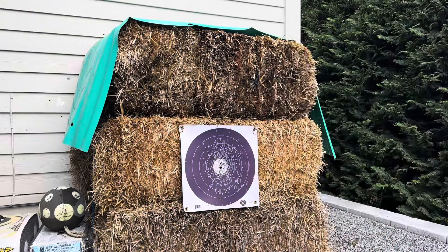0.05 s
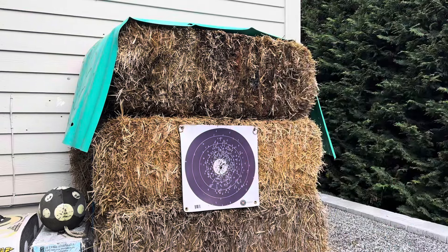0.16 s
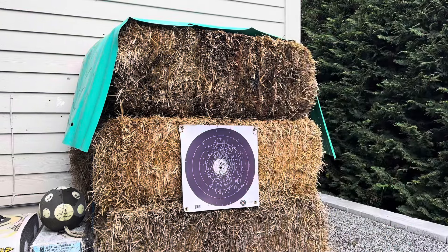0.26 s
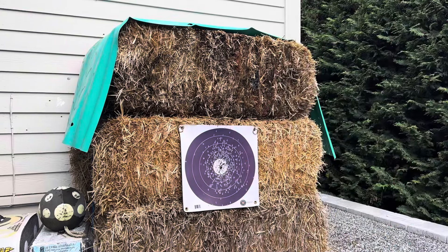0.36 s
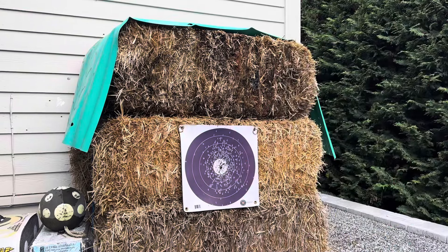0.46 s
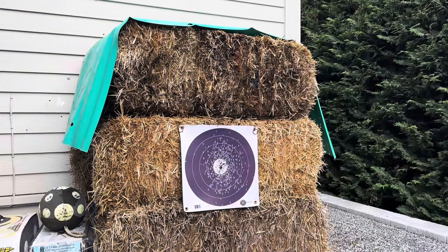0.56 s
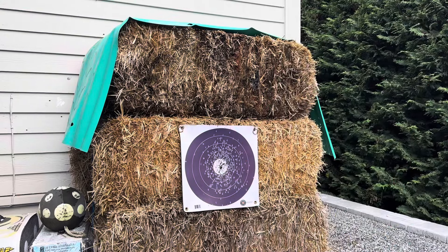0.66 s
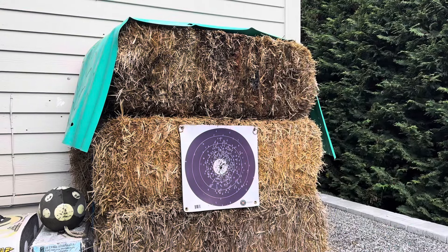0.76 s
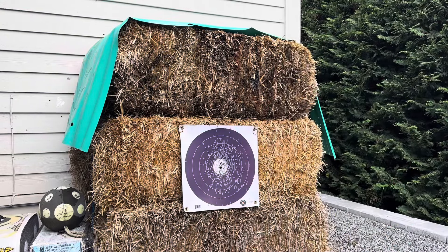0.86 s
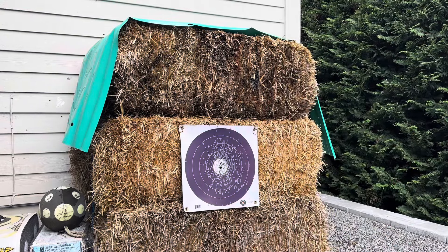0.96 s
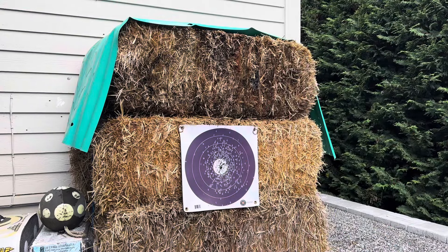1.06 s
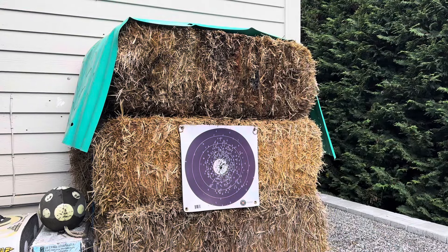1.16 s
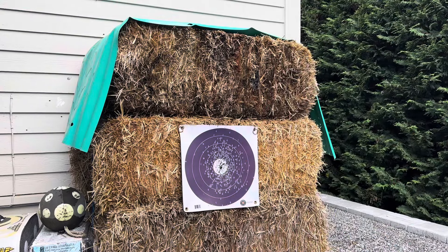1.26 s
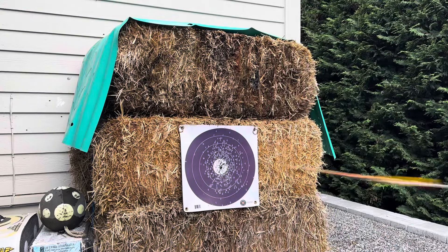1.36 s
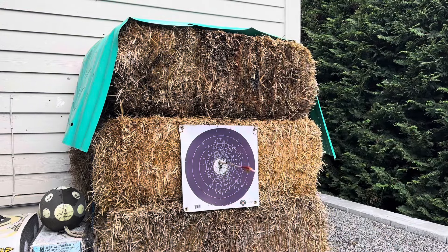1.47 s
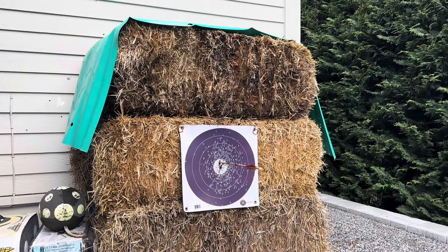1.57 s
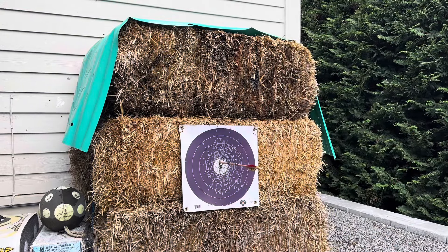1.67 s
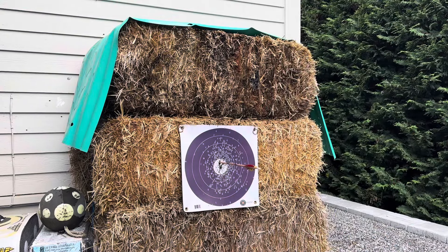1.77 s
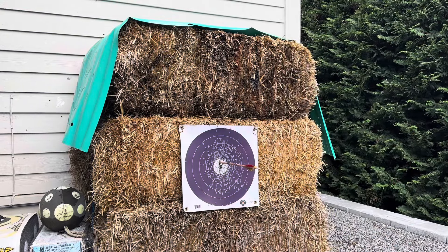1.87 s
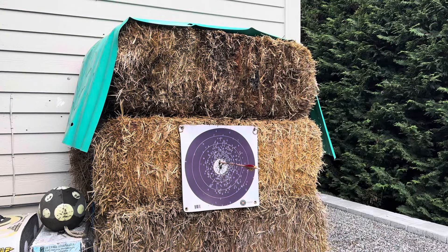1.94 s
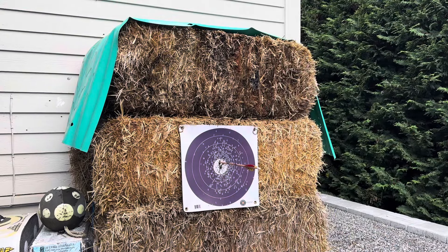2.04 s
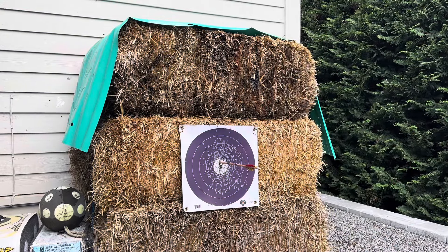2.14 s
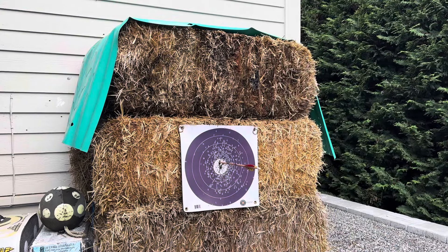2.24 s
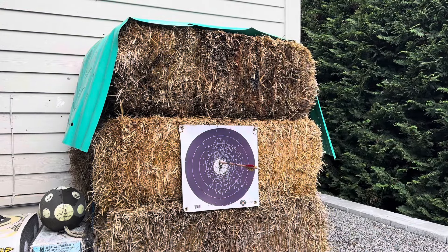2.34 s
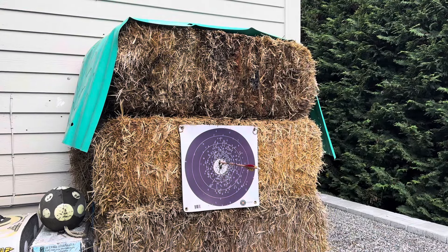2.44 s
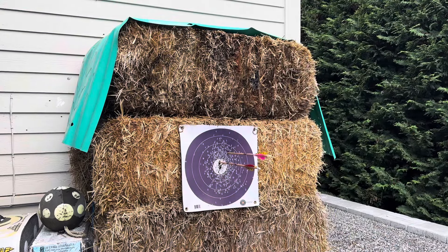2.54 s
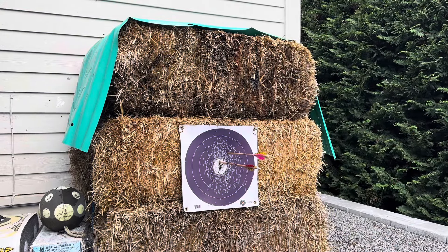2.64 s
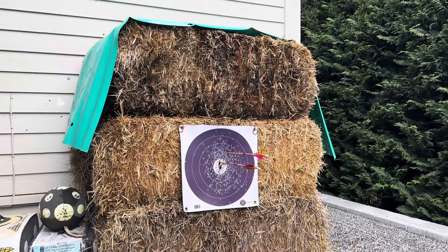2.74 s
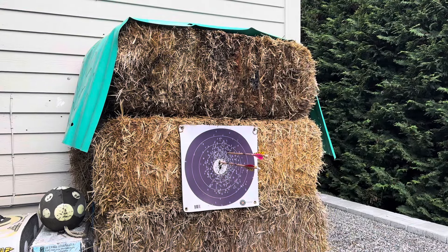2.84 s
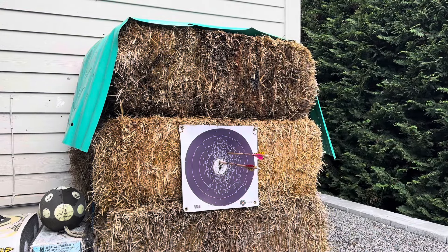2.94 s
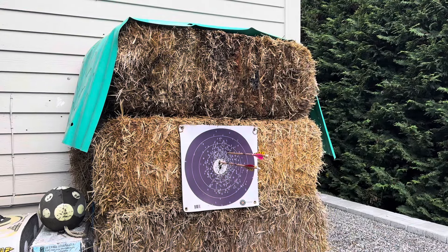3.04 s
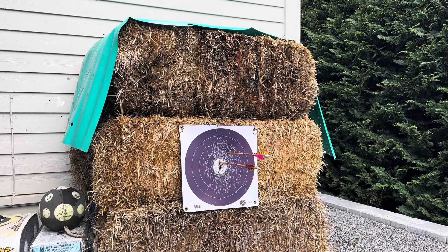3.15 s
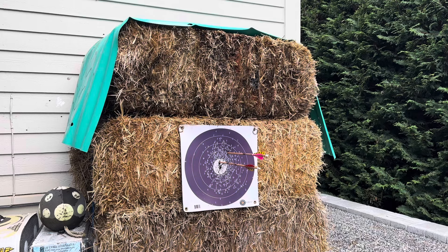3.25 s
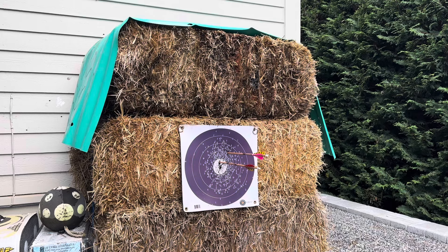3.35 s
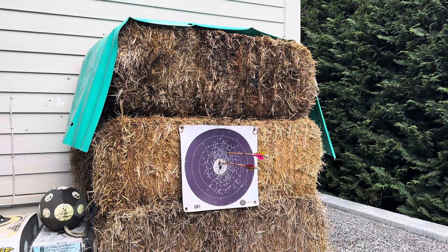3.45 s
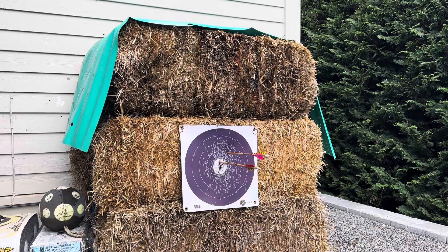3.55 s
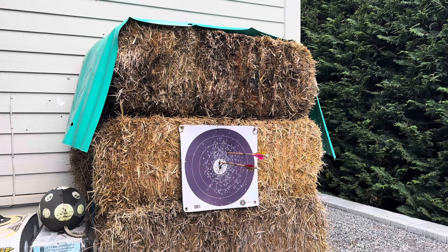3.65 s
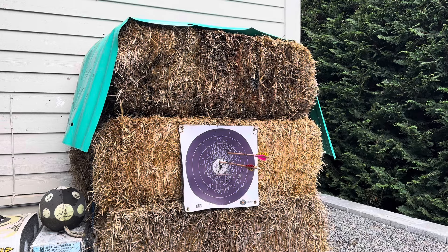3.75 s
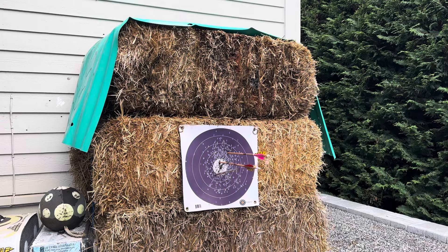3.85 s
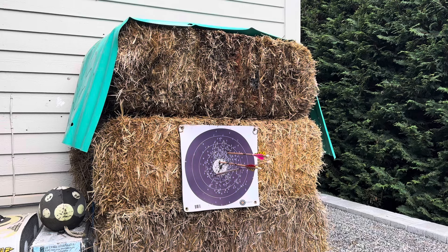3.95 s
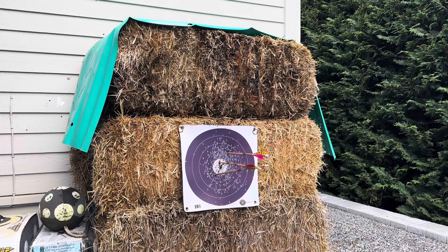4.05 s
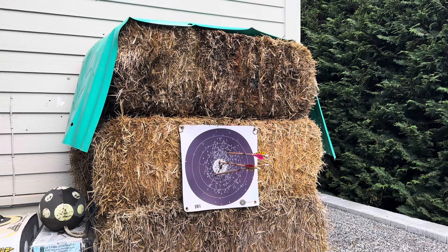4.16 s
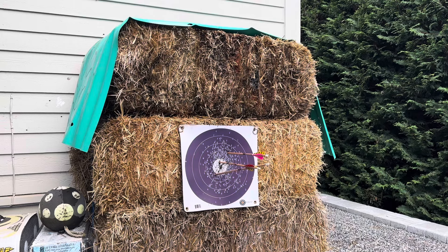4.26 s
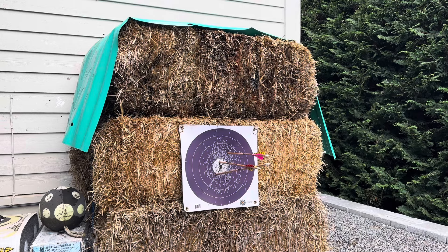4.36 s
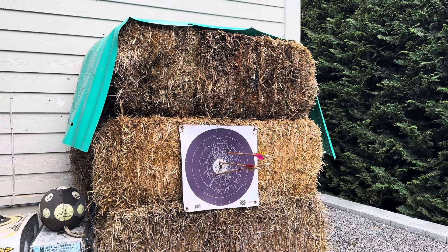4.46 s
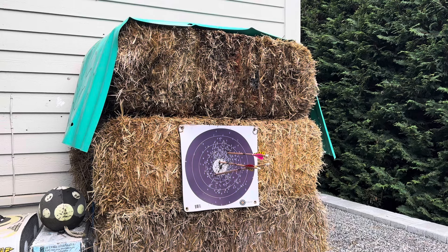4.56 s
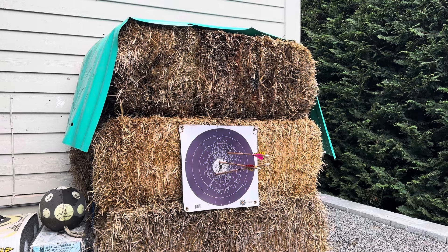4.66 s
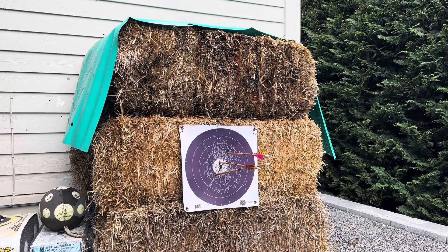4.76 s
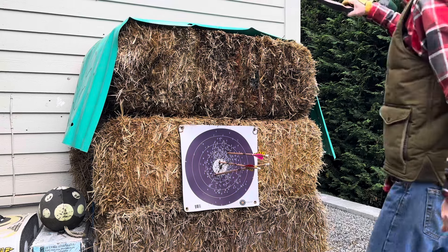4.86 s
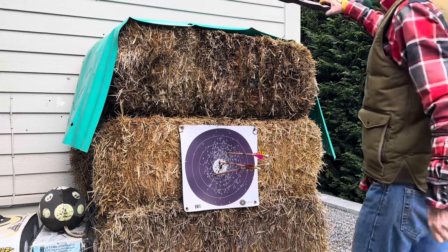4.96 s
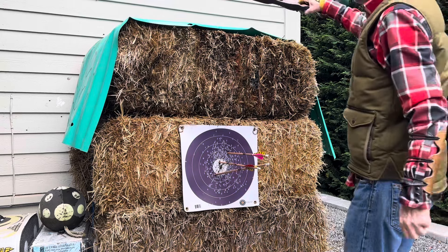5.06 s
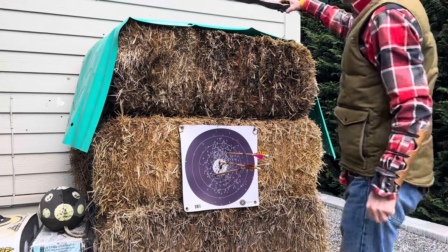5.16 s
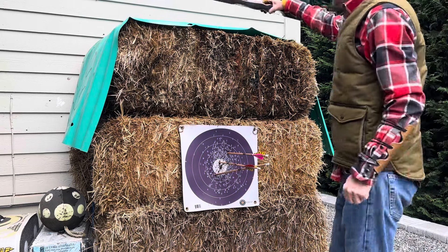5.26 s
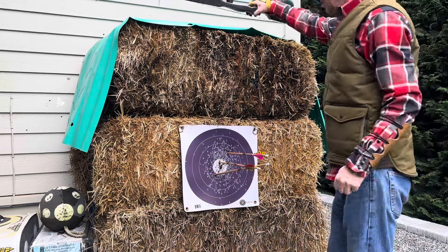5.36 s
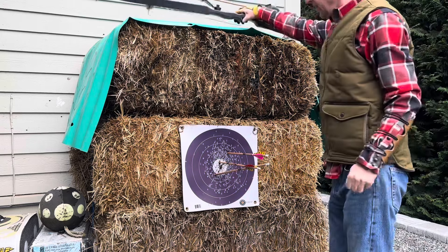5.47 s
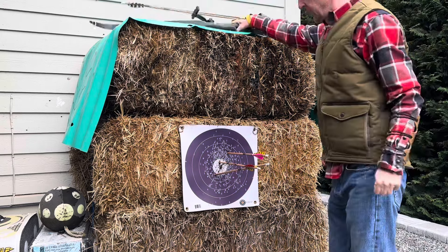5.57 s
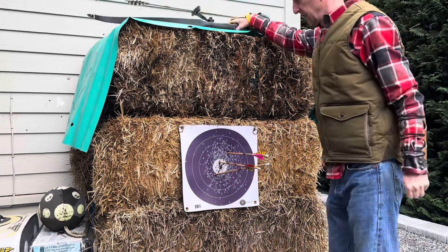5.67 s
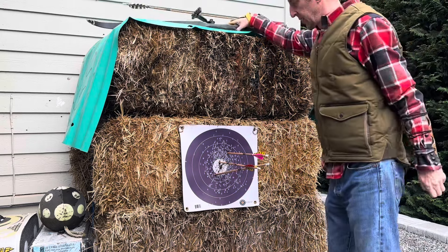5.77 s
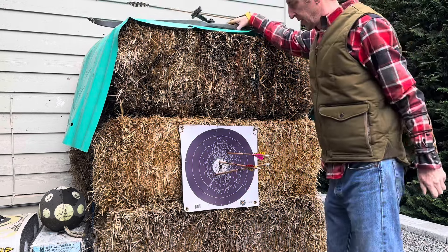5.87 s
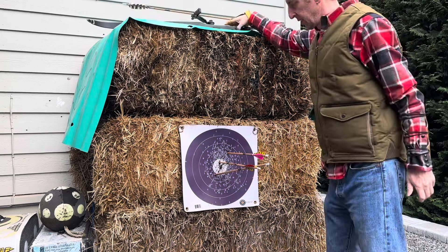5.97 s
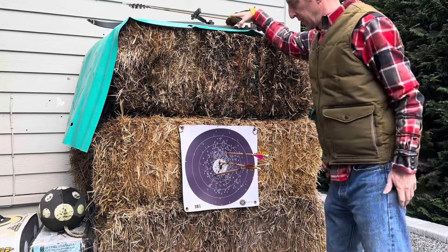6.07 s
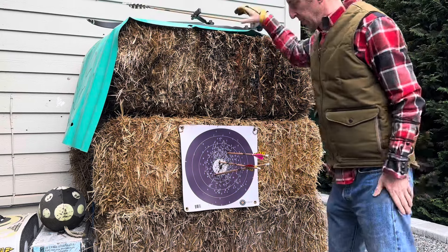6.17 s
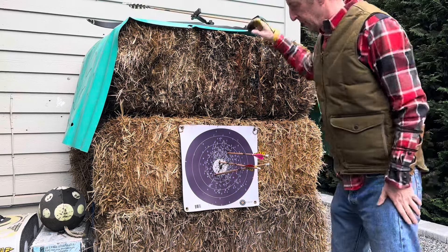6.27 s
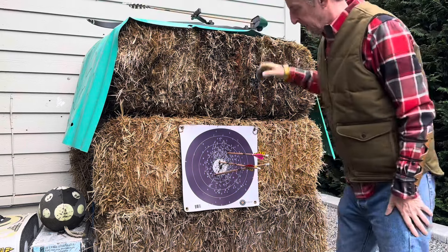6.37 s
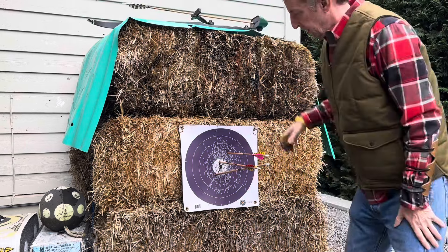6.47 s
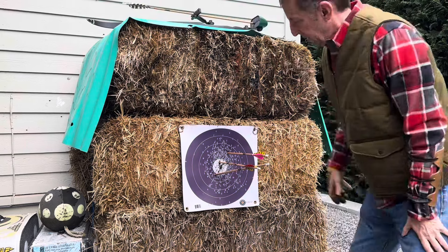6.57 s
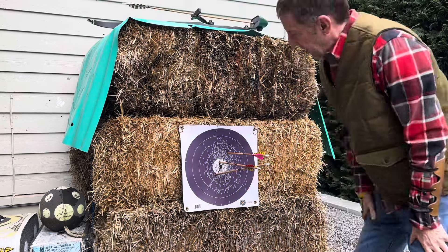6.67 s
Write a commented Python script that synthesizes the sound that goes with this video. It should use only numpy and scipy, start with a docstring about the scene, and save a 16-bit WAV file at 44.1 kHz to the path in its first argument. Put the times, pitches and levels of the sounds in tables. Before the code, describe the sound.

A quiet outdoor yard by a wall, heard close to the target in stereo, with low distant traffic and a faint fan hum that thins as scenes change at brief dips near 0.7, 2.2, 3.1 and 4.8 seconds. Light gravel scuffs, pebble ticks and taps fill the first 0.65 seconds. A bow clicks and thumps softly at 1.2; a tiny whoosh ends in a sharp knock at 1.4, card crack over dull bale thump and crackling straw. The second release at 2.3 leads to a much louder hit at 2.5. The third, released at 3.55, lands hard at 3.7 with shafts rattling. Soft heel thumps follow at 4.0, and a barely audible chirp at 4.7. From 4.9 shoes crunch gravel with stony clicks; at 5.5 to 5.8 a bow bumps onto covered straw with muffled thuds and small squeaks. Faint rustles and finger taps continue until about 6.65.

```python
"""Three arrows strike a card face on straw bales: a falling knock, noise cracks, a dull bale thump and straw.
Before each hit the bow clicks and thumps as decaying sines with a noise slap, and filtered noise whooshes.
The archer moves on gravel, heard as noise grains and ringing pebbles, and lays the bow on a tarpaulin with
noise thuds and sine thumps. Far traffic, a fan and faint chirps are shaped noise.
Five scenes in a yard beside a house wall are joined by short dips in level."""
import sys
import numpy as np
from scipy import signal
from scipy.fft import rfft, irfft, next_fast_len
from scipy.io import wavfile
from scipy.ndimage import map_coordinates

SR = 44100
rng = np.random.default_rng(int(sys.argv[2]) if len(sys.argv) > 2 else 0)


def transcribe(u):
    """Save the signal u as a 16-bit wav file named by the first command-line argument.

    u: samples, shape (n,) or (channels, n), limited to [-1, 1]; the rate is SR.
    q: integer samples, one column per channel.
    """
    v = np.clip(np.atleast_2d(u).T, -1, 1)
    q = np.round(v * 32767).astype(np.int16)
    wavfile.write(sys.argv[1], SR, q)


N = 295911  # length [samples]

# Arrow hits: (time [s], knock [dB], crack [dB], thump [dB], straw [dB], left minus right [dB],
# nominal bale pitch [Hz]); levels are before the trims in arrows()
HITS = [(1.394, -15, -17, -20.5, -30.5, 1.5, 154), (2.481, -6.5, -11.5, -22, -29.5, 1.5, 213.7),
        (3.714, -5, -12.5, -18, -27, 0.5, 167.3)]
# The knock's gliding pitch and bell-shaped decay
KNOCK_TOP_HZ, KNOCK_END_HZ, KNOCK_FALL_S, KNOCK_LENGTH_S = 1800, 290, 0.002, 0.005
SLAP_BACK_S, SLAP_BACK_DB = 0.008, -15  # the card slaps back on the straw
# Colour of the card's crack: (frequency [Hz], relative level per Hz [dB])
CRACK_SPECTRUM = [(710, -36), (1200, -2.5), (2000, -8.5), (4860, -11), (7170, -13), (8630, -19.5),
                  (11400, -17), (16000, -21)]
# Colour of the bale's thump: (frequency [Hz], relative level per Hz [dB])
BALE_SPECTRUM = [(29, -40.5), (50, -10.5), (124, -6.5), (207, -5), (523, -17), (696, -25), (886, -21),
                 (1100, -15), (1500, -29.5), (1950, -56.5), (3300, -120)]
# Decay of the bale's thump: (frequency [Hz], time to fall 60 dB [s])
BALE_T60 = [(60, 0.4), (200, 0.27), (600, 0.27), (1500, 0.027)]
# Colour of crushed stalks and wall echo: (frequency [Hz], relative level per Hz [dB])
STRAW_SPECTRUM = [(470, -34), (800, -3), (1850, -15), (3510, -16.5), (9330, -17.5), (11000, -17.5),
                  (12500, -20.5), (16000, -19.5)]
# Shafts knocking together: (time [s], click before trim [dB], straw [dB])
RATTLES = [(3.6865, -40.5, -36), (3.6946, -31.5, -46), (3.7616, -33, -32.5), (3.7637, -27.5, -43.5),
           (3.77, -29, -39), (3.806, -29, -37), (3.8075, -16, -31)]

# Bow releases: (time [s], thump [dB], slap relative to thump [dB])
RELEASES = [(1.222, -24, -14.5), (2.304, -24, -16.5), (3.542, -23, -17)]
# Rings of limbs and string: (nominal frequency [Hz], relative level [dB], time to fall 60 dB [s])
BOW_RINGS = [(74, 3.5, 0.13), (149, 8, 0.037), (321, -16.5, 0.25), (488, -13.5, 0.27), (218, -13.5, 0.19),
             (880, -19.5, 0.11), (633, -22.5, .15)]
TIGHTEN_SHARE, TIGHTEN_S = 0.07, 0.01  # how flat the bow starts, and how fast it rises to pitch
# Colour of the string slap: (frequency [Hz], relative level per Hz [dB])
SLAP_SPECTRUM = [(350, -16), (600, 0.5), (1750, -14), (2070, -9.5), (8500, -11.5), (11300, -22),
                 (12500, -21), (16000, -20.5)]
# The string rushes forward, the nock clicks off it
RUSH_DB, RUSH_SLOPE_DB_PER_S, NOCK_DB, NOCK_HZ = -51, 1314, -19.5, 7095
# Arrow flights: (loudest time [s], whoosh level [dB])
FLIGHTS = [(1.366, -51.5), (2.428, -46.5), (3.664, -54.5)]
APPROACH_DB_PER_S, RECEDE_DB_PER_S = 251, 90
# Colour of rush and flight: (frequency [Hz], relative level per Hz [dB])
WHOOSH_SPECTRUM = [(410, -46.5), (700, 1), (1420, -12.5), (1680, -5), (3110, -13.5), (9230, -10),
                   (11400, -22.5), (14200, -15), (16000, -31)]
# Vanes whistling briefly: (time [s], level before trim [dB], pitch [Hz], length [s])
VANE_WHISTLES = [(1.365, -36, 6340, 0.011), (2.421, -34.5, 1674, 0.014), (2.445, -48, 2100, 0.016),
                 (3.658, -43.5, 1980, 0.017), (3.674, -38, 2170, 0.0071), (3.702, -33.5, 2280, 0.012)]

# Bow laid on the tarpaulin: (time [s], level before trim [dB], time to fall 60 dB at 400 Hz [s], bass lift [dB])
THUDS = [(5.516, -25.5, 0.19, -13), (5.569, -22.5, 0.1, 7), (5.591, -16.5, 0.17, -5),
         (5.623, -30, 0.56, 11), (5.684, -36.5, 0.59, -26), (5.805, -28.5, 0.073, -23),
         (5.957, -42, 0.54, -11.5)]
# Colour of the covered bale: (frequency [Hz], relative level per Hz [dB])
TARP_SPECTRUM = [(21, -35), (35, -5), (252, 7), (318, 1.5), (440, -3), (568, -15.5), (638, -12.5),
                 (883, -15), (1010, -15.5), (1900, -27), (2230, -27.5), (3320, -31), (9000, -39.5),
                 (11700, -70)]
# Heels on the ground, the bow's weight and limbs on the bale, before the soft attack:
# (time [s], level [dB], pitch [Hz], time to fall 60 dB [s])
THUMPS = [(4.015, -20.5, 79.7, 0.073), (4.112, -31.5, 80.6, 0.11), (5.609, -23, 57.3, 0.24),
          (5.749, -28.5, 68, 0.16), (5.592, -23, 304, 0.077), (5.608, -26, 160, 0.06),
          (5.65, -18.5, 186, 0.057), (5.681, -21, 122, 0.055), (5.737, -28.5, 200, 0.091),
          (5.778, -31, 329, 0.061), (6.647, -42, 265, 0.048)]
# Tarpaulin squeaking and ringing under the bow: (time [s], level before trim [dB], pitch [Hz], length [s])
SQUEAKS = [(5.518, -38.5, 1230, 0.024), (5.805, -45.5, 2020, 0.013), (5.815, -53, 2300, 0.035),
           (6.02, -57, 5730, 0.087)]

# Crunches of soles and rustles of cloth and tarpaulin:
# (loudest time [s], crunch [dB], rise [s], time to fall 60 dB [s], low-end lift or cut [dB])
SCUFFS = [(0.0, -47.5, .01, 0.27, 7), (0.1, -63, 0.09, 0.97, 4), (0.497, -45, 0.009, 1.34, 1),
          (0.515, -42.5, 0.011, 0.072, 2), (0.638, -35.5, 0.0018, 0.035, 7.5),
          (0.653, -38, 0.0028, 0.097, 4), (4.335, -67, 0.06, 0.4, 2), (4.85, -62, 0.19, 0.62, 1.5),
          (4.883, -29.5, 0.014, 0.21, -12.5), (4.9, -30.5, 0.018, 0.14, 1), (4.914, -40, 0.036, 0.17, 18),
          (5.295, -44.5, 0.01, 0.33, -1), (5.316, -36.5, 0.021, 0.33, 2.5), (5.344, -44.5, 0.04, 0.17, 5),
          (5.518, -59, 0.0084, 0.39, 21), (5.591, -42, 0.0063, 0.23, 20.5), (6.022, -62, 0.019, 0.46, -6),
          (6.267, -57.5, 0.034, 0.3, 7), (6.37, -56, 0.089, 0.4, 0), (6.46, -54.5, 0.21, 1.1, 2),
          (6.61, -62, 0.038, 1.1, 6.5)]
# Climb within the rise; loose stones settle faintly after
RISE_DB, SETTLE_DB, SETTLE_T60_S = 17, -16.5, 1.035
# Colour of the gravel: (frequency [Hz], relative level per Hz [dB])
GRAVEL_SPECTRUM = [(88, -2), (150, -5.5), (916, -4), (1720, -11), (5270, -15), (7200, -5), (10500, -8.5),
                   (13800, -14), (15600, -9), (16500, -46)]
GRAINS_PER_S, STONES_PER_S, STONES_DB = 9000, 300, -11  # bigger stones knock within the crunch
# Single pebbles: (time [s], click level [dB])
PEBBLES = [(0.094, -46), (0.186, -41.5), (0.393, -36.5), (0.471, -37), (0.495, -32), (0.637, -24),
           (0.653, -28), (4.186, -57), (5.0185, -24), (5.099, -38), (5.1645, -24), (5.1755, -36),
           (5.402, -34), (5.4896, -37), (6.022, -37.5)]
PEBBLE_HZ, PEBBLE_SPREAD = 7840, 0.12  # mean pitch, and its spread as a share
# Fingers tapping the tarpaulin and a stone's knock: (time [s], click level [dB], pitch [Hz])
TAPS = [(0.494, -19.5, 985), (0.638, -28, 850), (0.6525, -29, 890), (0.663, -24.5, 970), (4.872, -24, 700),
        (4.908, -19.5, 1290), (4.918, -17, 784), (4.946, -34, 695), (4.965, -19, 834), (5.293, -29, 450),
        (5.318, -30, 2000), (5.337, -18, 577), (5.351, -16, 2020), (5.4905, -31, 1500), (5.517, -21, 710),
        (5.96, -33, 603), (6.085, -36, 1300), (6.355, -30, 575), (6.393, -29.5, 700), (6.409, -32, 715),
        (6.468, -34, 600), (6.508, -40, 800), (6.527, -31, 570), (6.643, -26, 646)]

# Joined scenes: (start time [s], rumble [dB], hum [dB], fan [dB])
SCENES = [(0, -49, -57.5, -63.5), (0.682, -51.5, -58.5, -60), (2.216, -54.5, -70, -80),
          (3.084, -55, -76, -85), (4.814, -58, -67, -74.5)]
FADE_S = 0.036  # on each side of a joint
# Colour of far traffic: (frequency [Hz], relative level per Hz [dB])
RUMBLE_SPECTRUM = [(18, -48), (30, -27), (46, -4.5), (69, -1.5), (96, -7.5), (281, -20), (367, -23.5),
                   (414, -15.5), (456, -28), (798, -24.5), (1470, -48.5), (10000, -64), (13000, -87.5),
                   (22000, -120)]
# Colour of the brighter town hum: (frequency [Hz], relative level per Hz [dB])
HUM_SPECTRUM = [(120, -28), (200, -3), (352, 1.5), (390, -6), (569, -18), (698, -10.5), (1150, -14),
                (1410, -18), (2240, -22.5), (4150, -51.5), (12000, -65.5)]
# Tones of a fan somewhere: (frequency [Hz], width of one resonance [Hz], relative level [dB])
FAN_TONES = [(402, 27, 0.5), (268.4, 14, -0.5), (1350, 300, -1)]
TYRES_DB, TYRES_HZ, TYRES_WIDTH_HZ = -59.5, 953, 270  # far tyre roar, first scene only
# Faint far chirps: (time [s], level before trim [dB], pitch [Hz], length [s])
CHIRPS = [(2.7, -75, 2350, 0.1), (4.69, -71, 2920, 0.14)]

# Stereo width straight from the target: (frequency [Hz], side minus mid [dB])
DIRECT_WIDTH = [(60, -14), (150, -22.5), (380, -29), (950, -26), (2380, -13), (5980, -10.5), (11000, -22)]
# Stereo width of near sound with its echoes: (frequency [Hz], side minus mid [dB])
NEAR_WIDTH = [(60, -9), (150, -18), (380, -6), (950, 2.5), (2380, -4.5), (5980, 1.5), (10000, -20),
              (15000, -21)]
# Stereo width of far sound: (frequency [Hz], side minus mid [dB])
FAR_WIDTH = [(60, -16.5), (150, -12.5), (380, -4.5), (950, 3), (2380, -3.5), (5980, -0.5), (15000, 1.5)]
# The two microphone ports: (frequency [Hz], phase by which left leads [radians])
PORTS = [(0, 0), (5000, .1), (6460, 1.8), (7150, 1.9), (7670, 3.2), (8010, 5.8), (8530, 6.1), (10400, 3.5),
         (12300, 2.7), (13900, 0), (16500, -.6)]
CUTOFF_HZ = 16900


def arrows():
    """Bending waves in the card arrive highs first, a falling knock; the bale thumps and straw crackles after."""
    out, t = np.zeros((2, N)), np.arange(SR // 5) / SR
    hz = KNOCK_END_HZ + (KNOCK_TOP_HZ - KNOCK_END_HZ) * np.exp(-t / KNOCK_FALL_S)
    # the straw behind the card stops the knock quickly
    knock = np.sin(2 * np.pi * np.cumsum(hz) / SR)
    knock *= (1 - np.exp(-(t / 0.0015) ** 3)) * np.exp(-(t / KNOCK_LENGTH_S) ** 2)
    for s, knock_db, crack_db, thump_db, straw_db, pan_db, bale_hz in HITS:
        add(out, from_db(knock_db + 1.5) * knock * from_db([[pan_db / 2], [-pan_db / 2]]), s)
        add(out, from_db(knock_db + SLAP_BACK_DB) * knock, s + SLAP_BACK_S)
        crack = burst(CRACK_SPECTRUM, [(1500, 0.017), (8000, 0.01)], rise_s=0.00021, width=DIRECT_WIDTH)
        add(out, from_db(crack_db + 4.0) * crack, s + 0.0007)
        thump = burst(BALE_SPECTRUM, BALE_T60, rise_s=0.00069, rise_cycles=1.6)
        add(out, from_db(thump_db - 3.0) * thump, s)
        add(out, from_db(thump_db - 4.5) * bale_swing(bale_hz, t), s)
        straw_t60 = [(1000, 0.12), (3000, 0.18), (8000, 0.2), (14000, 0.078)]
        add(out, from_db(straw_db) * burst(STRAW_SPECTRUM, straw_t60, rise_s=0.0019), s)
        # the yard answers faintly and longer
        yard_t60 = [(1000, 0.91), (3000, 1.0), (7000, 0.68), (12000, 0.12)]
        add(out, from_db(straw_db - 27.5) * burst(STRAW_SPECTRUM, yard_t60, rise_s=0.03), s)
    return out + shaft_rattles()


def bale_swing(bale_hz, t):
    """The whole bale swings, sagging to a pitch set by where it is hit; loose straw makes it lumpy."""
    turn = 2 * np.pi * bale_hz * np.cumsum(0.96 + 0.4 * np.exp(-t / 0.012)) / SR
    envelope = (1 - np.exp(-t / 0.04)) * np.exp(-(t / 0.048) ** 2)
    return np.sin(turn) * envelope * from_db(3.0 * drift(110, len(t)))


def shaft_rattles():
    """Shafts knock together: bass-free noise clicks, each with a rustle of straw."""
    out = np.zeros((2, N))
    high_pass = signal.butter(2, 1400, "high", fs=SR, output="sos")  # thin shafts have no bass
    for s, click_db, straw_db in RATTLES:
        click = burst(CRACK_SPECTRUM, [(1500, 0.007), (8000, 0.004)], rise_s=0.0004, width=DIRECT_WIDTH)
        add(out, from_db(click_db + 14.0) * signal.sosfilt(high_pass, click), s)
        straw = burst(STRAW_SPECTRUM, [(1000, 0.064), (4000, 0.26), (12000, 0.17)], rise_s=0.0016)
        add(out, from_db(straw_db) * straw, s)
    return out


def bow():
    """The string slaps home, then limbs and string swing out as wavering, decaying sines."""
    out, t = np.zeros((2, N)), np.arange(SR // 2) / SR
    for s, thump_db, slap_db in RELEASES:
        # the grip in the hand makes each ring waver; the pitch climbs as the string tightens
        pitch = 1 - TIGHTEN_SHARE * np.exp(-t / TIGHTEN_S) + 0.012 * drift(25, len(t))
        turn = 2 * np.pi * np.cumsum(pitch) / SR
        swing = 0
        for hz, db, t60 in BOW_RINGS:
            swing = swing + from_db(db - 60 * t / t60 + 5.4 * drift(53, len(t))) * np.sin(hz * turn)
        add(out, from_db(thump_db) * swing * (1 - np.exp(-(t / 0.009) ** 2)), s)
        slap = burst(SLAP_SPECTRUM, [(600, 0.24), (10000, 0.25)], rise_s=0.0025)
        add(out, from_db(thump_db + slap_db) * slap, s - 0.003)
    nock_rows = [(s + 0.0032, NOCK_DB, NOCK_HZ) for s, *_ in RELEASES]
    return out + clicks(nock_rows, cycles=14.0, chip_share=1.0, partner=0.7)


def flight():
    """Air rushing past string and arrow: shaped noise, fluttering as the vanes shake, with brief whistles."""
    flutter = lambda hz: from_db(3.3 * drift(90, N))
    whoosh = bands(rng.standard_normal((2, 2, N)), WHOOSH_SPECTRUM, NEAR_WIDTH, flutter)
    return flight_gain() * whoosh + whistles(VANE_WHISTLES, width_share=0.2)


def flight_gain():
    """The string's rush peaks at the release; the arrow's hiss swells, recedes and stops at the hit."""
    t, gain = np.arange(N) / SR, 0
    for s, *_ in RELEASES:
        gain = gain + decibel_peak(s, RUSH_DB, RUSH_SLOPE_DB_PER_S, RUSH_SLOPE_DB_PER_S)
    for (s, db), hit in zip(FLIGHTS, HITS):
        gain = gain + decibel_peak(s, db, APPROACH_DB_PER_S, RECEDE_DB_PER_S) * (t < hit[0])
    return gain


def archer():
    """The bow bumps down on the covered bale, a sharp contact on a soft body; weight lands softly."""
    out, t = np.zeros((2, N)), np.arange(SR // 3) / SR
    for s, db, t60, bass_db in THUDS:
        # the bass lift is full from 150 Hz down
        colour = [(hz, level_db + bass_db * np.clip(np.log2(300 / hz), 0, 1)) for hz, level_db in TARP_SPECTRUM]
        decay = [(60, 2.46 * t60), (400, t60), (4000, 2.44 * t60)]
        add(out, from_db(db - 5.0) * burst(colour, decay, rise_s=0.00027, rise_cycles=0.16), s)
    for s, db, hz, t60 in THUMPS:
        envelope = (1 - np.exp(-t * hz / 0.84)) * from_db(-60 * t / t60)
        add(out, from_db(db) * np.sin(2 * np.pi * hz * t) * envelope, s)
    return out + whistles(SQUEAKS, width_share=0.11)


def gravel():
    """Dense uneven grains crunch under the soles; bigger stones, a few pebbles and taps ring as they knock."""
    sizes = from_db(2.4 * np.minimum(rng.exponential(1, N), 5)) * (rng.random(N) < GRAINS_PER_S / SR)
    sizes = sizes * from_db(0.91 * drift(150, N))  # the stones give way in clumps
    grains = rms_one(sizes * rng.standard_normal((2, 2, N)))
    gain, dark_db = scuffs()
    # the darkness acts below 3000 Hz and is full from 750 Hz down
    shape = lambda hz: from_db(dark_db * np.clip(np.log2(3000 / hz) / 2, 0, 1) + 2.2 * drift(40, N))
    crunch = gain * bands(grains, GRAVEL_SPECTRUM, NEAR_WIDTH, shape)
    stones = gain * from_db(STONES_DB + dark_db / 2) * stone_knocks(sizes)
    pebbles = [(s, db, PEBBLE_HZ * (1 + PEBBLE_SPREAD * rng.standard_normal())) for s, db in PEBBLES]
    ticks = clicks(pebbles, cycles=14.0, chip_share=1.0, partner=0.48)
    taps = clicks(TAPS, cycles=6.0, chip_share=0.12, partner=1.63)
    return crunch + stones + ticks + taps


def stone_knocks(sizes):
    """A few of the grains strike bigger stones, dealt at random to twelve resonances."""
    knocks = sizes * (rng.random(N) < STONES_PER_S / GRAINS_PER_S)
    dealt, stones = rng.integers(0, 12, N), 0
    for k, hz in enumerate(np.geomspace(450, 2200, 12)):
        struck = knocks * (dealt == k) + 1e-18
        stones = stones + resonate(struck, hz, 0.3 * hz) * np.sqrt(1000 / hz)
    return rms_one(stones)


def scuffs():
    """Gain and darkness [dB] of the crunch: each scuff dies in two stages, within its own scene."""
    power, dark, scenes = 1e-20, 0, scene_of_sample()
    for s, db, rise_s, t60, dark_db in SCUFFS:
        main = decibel_peak(s, db, RISE_DB / rise_s, 60 / t60)
        settle = decibel_peak(s, db + SETTLE_DB, RISE_DB / rise_s, 60 / SETTLE_T60_S)
        own = (main ** 2 + settle ** 2) * (scenes == scenes[int(s * SR)])
        power, dark = power + own, dark + own * dark_db
    return np.sqrt(power), dark / power


def traffic():
    """A low rumble and a brighter hum, both gently patchy noise, with tyre roar through two resonances."""
    rumble_db, hum_db, _ = scene_levels()
    patchy = lambda hz: from_db(0.7 * drift(1.5, N))
    rumble = bands(rng.standard_normal((2, 2, N)), RUMBLE_SPECTRUM, FAR_WIDTH, patchy)
    hum = bands(rng.standard_normal((2, 2, N)), HUM_SPECTRUM, FAR_WIDTH, patchy)
    roar = resonate_twice(rng.standard_normal((2, N)), TYRES_HZ, TYRES_WIDTH_HZ)
    tyres = from_db(TYRES_DB) * rms_one(roar + 0.28 * roar[::-1]) * (scene_of_sample() == 0)
    return tyres + from_db(rumble_db) * rumble + from_db(hum_db) * hum


def fan():
    """A fan somewhere hums: one noise through a few doubled resonances."""
    air = rng.standard_normal((2, N))
    tones = sum(from_db(db) * rms_one(resonate_twice(air, hz, width)) for hz, width, db in FAN_TONES)
    return from_db(scene_levels()[2]) * tones


def chirps():
    """Faint far bird chirps, each a short swell of narrow noise."""
    return whistles(CHIRPS, width_share=0.15)


def scene_of_sample():
    """Which joined scene each sample lies in."""
    return np.searchsorted(np.array(SCENES)[:, 0], np.arange(N) / SR, "right") - 1


def scene_levels():
    """Rumble, hum and fan levels [dB] at every sample."""
    return np.array(SCENES)[scene_of_sample(), 1:].T


def clicks(rows, cycles, chip_share, partner):
    """Each click is a short ring at its pitch and at a partner mode, plus a chip of noise."""
    out, t = np.zeros((2, N)), np.arange(SR // 25) / SR
    for (s, db, hz), pan_db in zip(rows, rng.normal(0, 1.4, len(rows))):
        # differencing the noise leaves mostly treble
        chip = np.diff(rng.standard_normal(len(t) + 4), 4) / 8 * from_db(-60 * t / 0.005)
        ring = np.sin(2 * np.pi * hz * t) + 0.37 * np.sin(2 * np.pi * partner * hz * t)
        ring = ring * from_db(-60 * t * hz / cycles) * np.tanh(t * hz * cycles / 10)
        add(out, from_db(db) * (ring + chip_share * chip) * from_db([[pan_db], [-pan_db]]), s)
    return out


def whistles(rows, width_share):
    """Short swells of noise twice through a narrow resonance."""
    out = np.zeros((2, N))
    for s, db, hz, length in rows:
        air = rng.standard_normal((2, SR // 5))
        air = resonate_twice(air + 0.93 * air[::-1], hz, width_share * hz)
        size = int(length * SR)
        swell = rms_one(np.linspace(0, 1, size) ** 0.35 * np.linspace(1, 0, size) ** 1.1)
        add(out, from_db(db - 5.0) * rms_one(air)[:, -size:] * swell * 0.6, s)
    return out


def burst(spectrum, t60, rise_s, rise_cycles=0.0, width=NEAR_WIDTH):
    """Noise that swells fast and dies band by band; rise_cycles makes low bands rise slower."""
    t = np.arange(SR // 2) / SR
    crackle = rms_one(from_db(2 * drift(500, len(t))))  # uneven level
    white = rng.standard_normal((2, 2, len(t))) * crackle
    shape = lambda hz: (1 - np.exp(-t / (rise_s + rise_cycles / hz))) * from_db(-60 * t / at_hz(t60, hz))
    return bands(white, spectrum, width, shape)


def bands(source, spectrum, width, shape):
    """Third-octave bands of two pairs of noises, each band with its level, stereo width and own time shape."""
    out, power, edges = 0, 0, 30 * 2 ** np.arange(0, 9.4, 1 / 3)
    for k, (low, high) in enumerate(zip(edges, edges[1:])):
        hz = np.sqrt(low * high)
        gain = from_db(at_hz(spectrum, hz))
        power += gain ** 2 * (high - low) * 2 / SR
        band_pass = signal.butter(2, [low, high], "band", fs=SR, output="sos")
        mid, side = signal.sosfilt(band_pass, source[k % 2])  # neighbours use different noises
        out = out + gain * shape(hz) * (mid + from_db(at_hz(width, hz)) * side * [[1], [-1]])
    return out / np.sqrt(power)


def resonate(x, hz, width_hz):
    """One resonance, gain about 1 on top."""
    r = np.exp(-np.pi * width_hz / SR)
    numerator = (1 - r * r) / 2 * np.array([1, 0, -1])
    return signal.lfilter(numerator, [1, -(1 + r * r) * np.cos(2 * np.pi * hz / SR), r * r], x)


def resonate_twice(x, hz, width_hz):
    """The same resonance twice in a row, for steeper sides."""
    return resonate(resonate(x, hz, width_hz), hz, width_hz)


def decibel_peak(s, db, rise_db_per_s, fall_db_per_s):
    """A gain that climbs to db at time s and sinks again, straight in decibels."""
    t = np.arange(N) / SR - s
    return from_db(db + np.where(t < 0, rise_db_per_s * t, -fall_db_per_s * t))


def drift(rate, size):
    """Smooth random wander through normal points, rate of them per second."""
    points = rng.standard_normal(int(size / SR * rate) + 3)
    return map_coordinates(points, [np.arange(size) / SR * rate], order=3)


def from_db(db):
    """Decibels to gain."""
    return 10 ** (np.asarray(db) / 20)


def rms_one(x):
    """Scale to rms 1."""
    return x / np.sqrt(np.mean(x ** 2) + 1e-20)


def at_hz(points, hz):
    """Read a table on a log-frequency axis."""
    table_hz, values = np.array(points).T
    return np.interp(np.log(hz), np.log(table_hz), values)


def add(out, x, s):
    """Mix x into out from time s on."""
    i = int(s * SR)
    out[..., i:i + x.shape[-1]] += x[..., :N - i]


def scene():
    """All sources, from the arrows to the far background."""
    return arrows() + bow() + flight() + archer() + gravel() + traffic() + fan() + chirps()


def record(dry):
    """The microphone drops deep bass, rounds peaks and shifts the ports' phase; joints dip, the top is cut."""
    high_pass = signal.butter(2, 36, "high", fs=SR, output="sos")
    scaled = signal.sosfilt(high_pass, dry) / 0.63
    left, right = 0.63 * scaled / (1 + scaled ** 4) ** 0.25  # loud peaks are rounded
    # the ports turn the treble of left and right against each other
    size = next_fast_len(N + SR // 10)
    lead = np.interp(np.arange(size // 2 + 1) * SR / size, *np.transpose(PORTS))
    left = irfft(rfft(left, size) * np.exp(1j * lead), size)[:N]
    to_joint = np.min([np.abs(np.arange(N) / SR - row[0]) for row in SCENES[1:]], axis=0)
    faded = np.array([left, right]) * np.clip(to_joint / FADE_S, 0.03, 1)
    return signal.sosfilt(signal.cheby2(12, 70, CUTOFF_HZ, fs=SR, output="sos"), faded)


dry = scene()
out = record(dry)
transcribe(out)
```